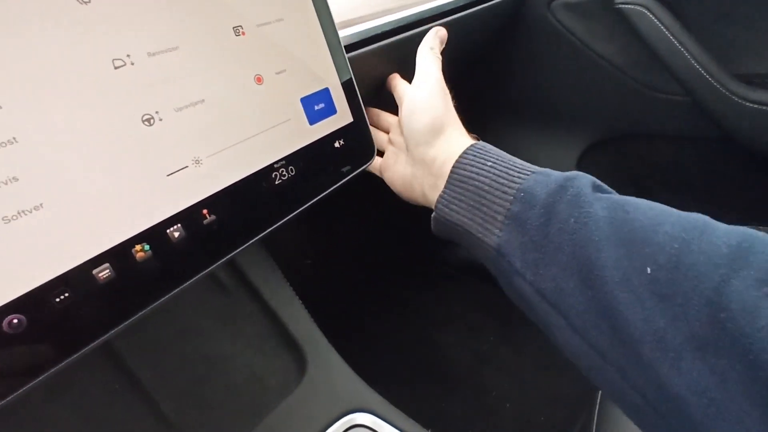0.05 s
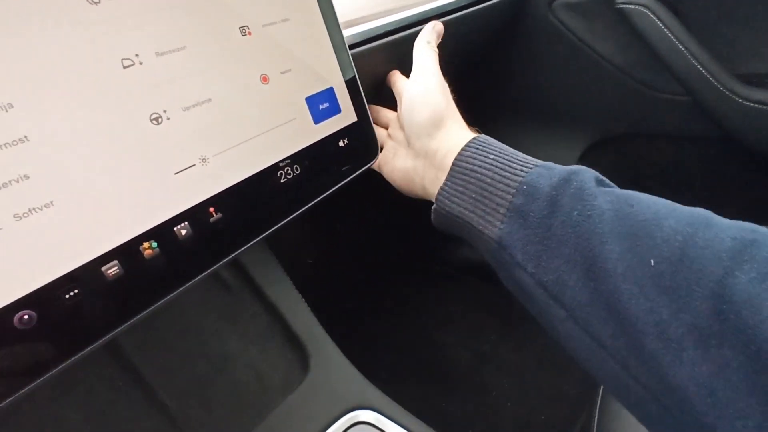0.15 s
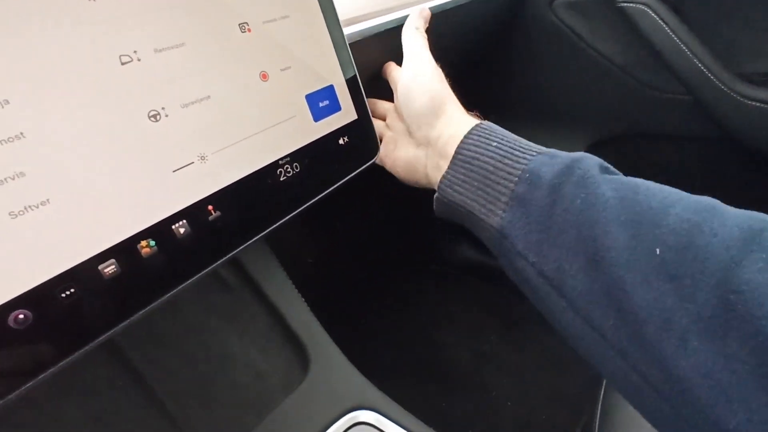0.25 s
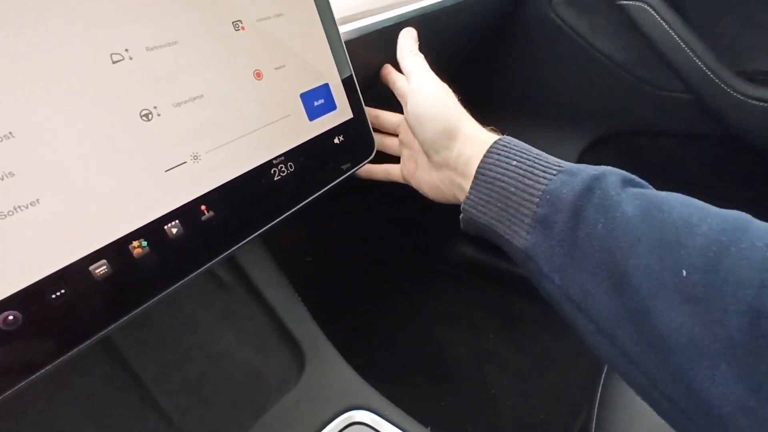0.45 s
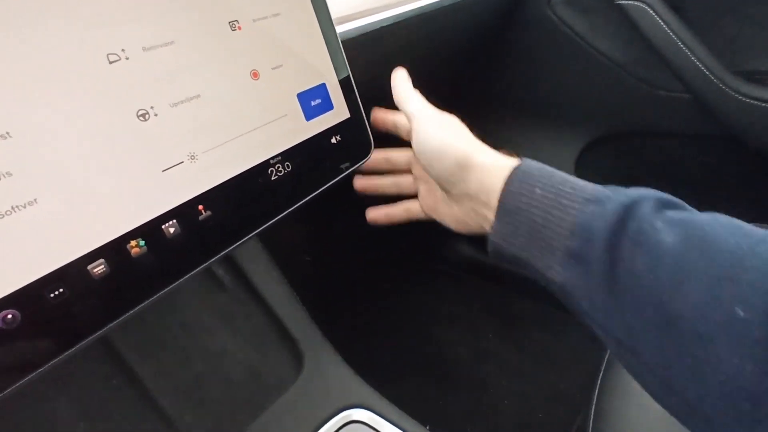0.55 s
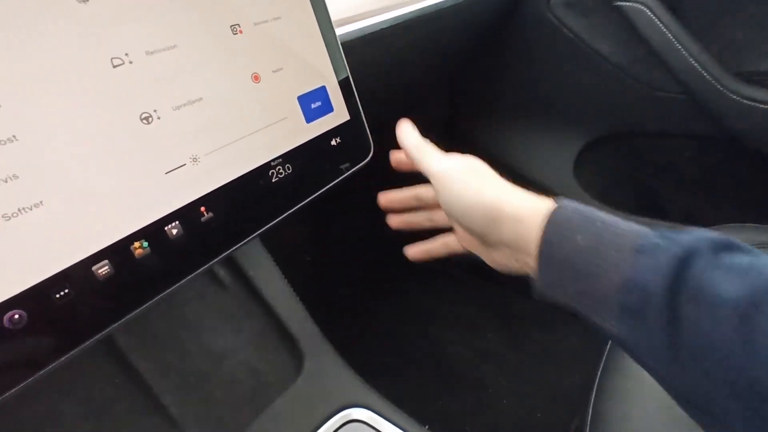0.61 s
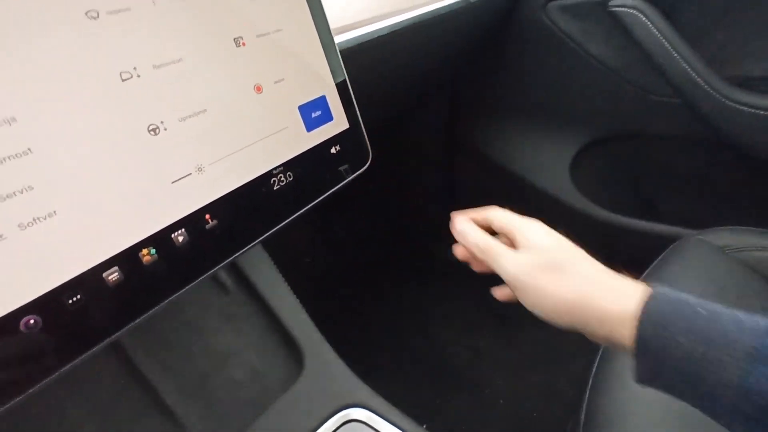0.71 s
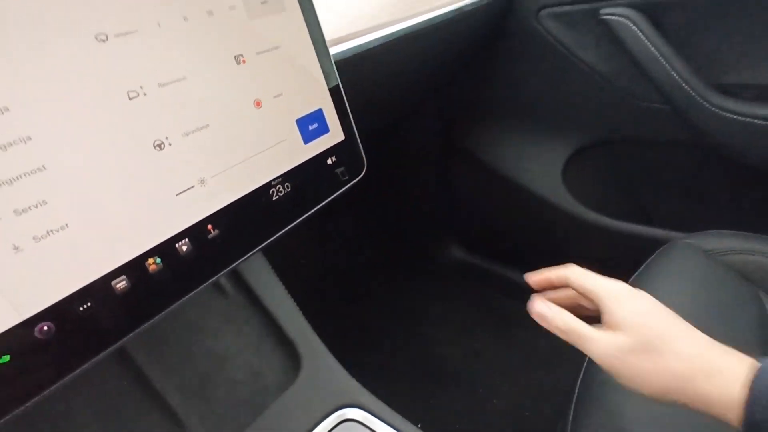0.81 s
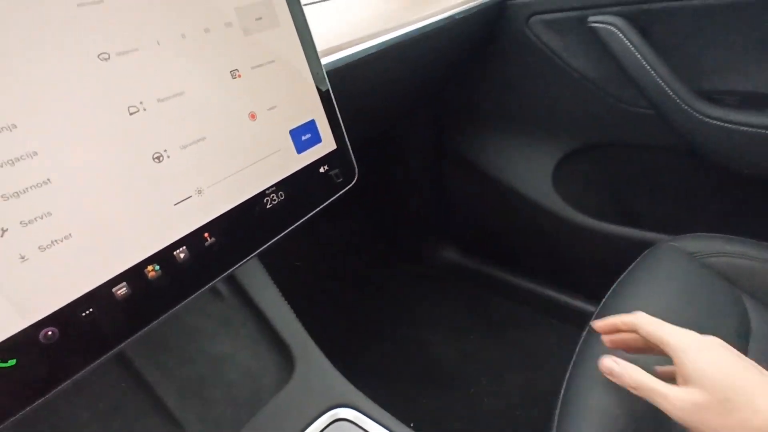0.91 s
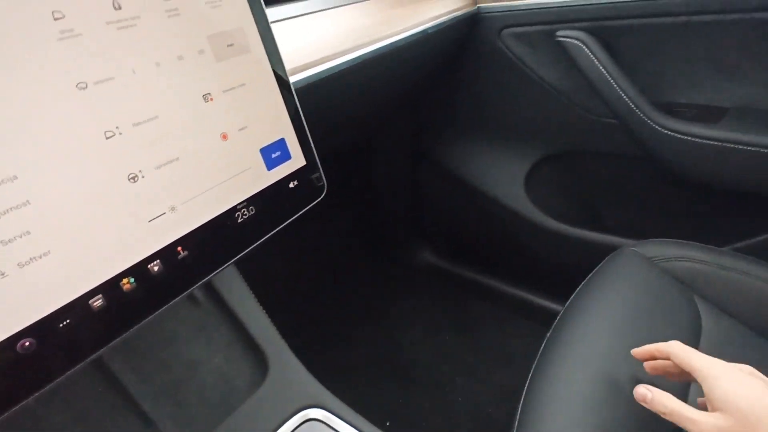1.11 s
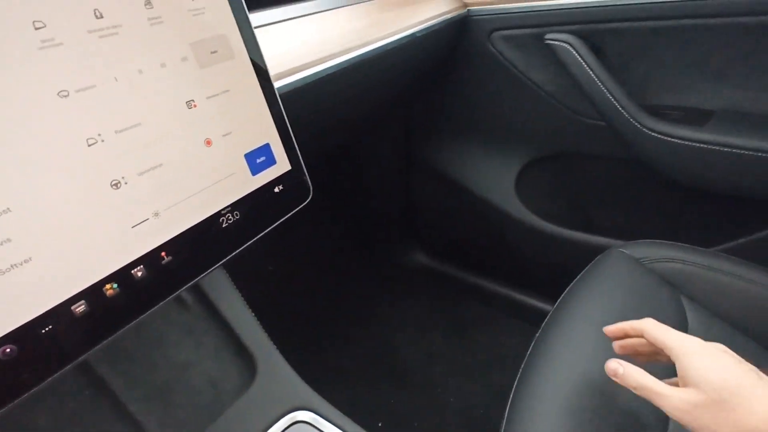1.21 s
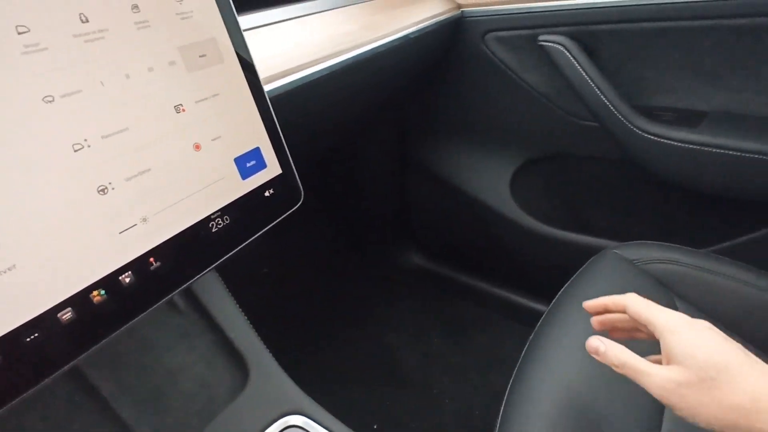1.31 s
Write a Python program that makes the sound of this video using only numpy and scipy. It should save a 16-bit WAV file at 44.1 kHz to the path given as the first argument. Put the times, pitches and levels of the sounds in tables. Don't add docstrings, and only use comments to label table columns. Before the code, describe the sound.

A plastic glovebox lid shuts in a parked car, heard close in a small, dry cabin. A faint knock tail fades at the start; around 0.2 s the lid rubs its frame and the latch snaps at 0.23 s in a bright, dense clack with a soft low thump. A tiny spring tone sags until about 0.75 s, with a faint finger slide; a quiet sleeve rustle follows from 0.75 s over low hum.

```python
import sys
import numpy as np
from scipy import signal
from scipy.fft import rfft, irfft, next_fast_len
from scipy.io import wavfile

SR = 44100
rng = np.random.default_rng(int(sys.argv[2]) if len(sys.argv) > 2 else 0)


def waveform_to_disk(signal):
    frames = np.transpose(np.atleast_2d(signal))
    scaled = np.clip(frames, -1, 1) * 32767
    samples = np.round(scaled).astype(np.int16)
    wavfile.write(sys.argv[1], SR, samples)


def attenuation_scalar(level_db):
    decades = np.asarray(level_db, float) / 20
    return 10 ** decades


N = 59535
LEAD = 2000

# (time [s], strength [dB], hardness of the bright crack [dB])
CONTACTS = [(-.004, -42, -12), (0.192, -45.5, -7.5), (0.2012, -42, -23.5), (0.2056, -43.5, -10.5),
            (0.2156, -37.5, -3), (.2200, -24.5, -13.5), (0.223, -34.5, 9), (.2270, -26.5, 8.5),
            (0.2294, -15, -3), (0.2323, -21, 4), (0.2369, -24, 6), (.2390, -26.5, 4), (0.2417, -26, -16.5),
            (0.2456, -30.5, -2), (0.2518, -30, -3.5), (0.2538, -37, -14), (0.265, -41.5, 9.5),
            (0.2768, -44.5, 5)]
# (frequency [Hz], level [dB], t60 [s])
LID_MODES = [(459, -10.5, 0.049), (531.8, -5.5, 0.057), (610, -17, 0.034), (778, -11.5, .03),
             (850, -5, 0.045), (980, -5, 0.015), (1123, -12, .03), (1231, -11.5, .03), (1487, -9.5, 0.062),
             (1715, -20, 0.029), (1940, -14.5, .04), (2377, -14.5, .03), (2590, -27.5, 0.011)]
# (frequency [Hz], level [dB], t60 [s])
LATCH_MODES = [(3120, -12.5, 0.017), (3258, -7.5, 0.033), (4000, 0.5, 0.013), (3970, -7.5, 0.012),
               (4600, -7, 0.041), (6250, -5, 0.03), (6720, -15, 0.011), (7300, -3.5, 0.024),
               (7850, -4, 0.005)]
LATCH_DB, STRIKE_SPREAD_DB = -9, 1
# (frequency [Hz], density [dB per Hz])
CRACK_COLOUR = [(500, -24.5), (1200, 4), (3000, -9.5), (7000, 2.5), (8600, -4), (9500, -16.5), (11400, -13),
                (12000, -10.5), (16000, -14.5)]
CRACK_DB, CRACK_T60_S = -6.5, 0.019
# (time [s], level [dB])
RATTLE = [
    (0, -54.5),
    (.03, -79),
    (.172, -75),
    (.19, -56.5),
    (.215, -44.5),
    (.2255, -33),
    (.2285, -26),
    (.245, -33.5),
    (.33, -67),
]
# (frequency [Hz], density [dB per Hz])
RATTLE_COLOUR = [(150, -24), (450, -3), (1000, -8.5), (1500, -6.5), (3000, -15), (8000, -20),
                 (10000, -36.5), (13000, -29)]
GRAINS_PER_S, GRAIN_SPREAD_DB = 12000, 2.0
# (time [s], then level into each of the three boom modes [dB])
PUSHES = [(-.0005, -68, -41, -46), (0.0114, -63, -41, -56), (0.2019, -55, -41, -42.5),
          (0.2127, -34, -30.5, -25.5), (0.2243, -48.5, -21.5, -27.5), (.2330, -40, -52.5, -18),
          (0.2369, -61, -54, -16.5), (0.2484, -46.5, -25, -45), (0.257, -56.5, -53, -25),
          (.273, -60, -48, -29), (0.2962, -35, -47, -55), (0.321, -50, -41, -63)]
# (frequency [Hz], t60 [s])
BOOM_MODES = [(83, 0.11), (127, 0.1), (280, 0.055)]
PUSH_CUT_HZ = 580
CABIN_T60_S, WET_DB, SEAT_CUT_HZ = 0.1, -14, 11000
# (time [s], level [dB])
SLEEVE = [(0, -63.5), (.06, -81.5), (.11, -71), (.17, -77), (.35, -85), (.6, -93.5), (.72, -74),
          (.79, -66.5), (.87, -64.5), (.95, -65.5), (1.02, -67.5), (1.18, -67.5), (1.21, -66.5),
          (1.25, -68.5), (1.32, -64.5), (1.35, -66)]
# (frequency [Hz], density [dB per Hz])
SLEEVE_COLOUR = [(300, -15), (800, 0.5), (1300, -3), (2500, -7), (4000, -5.5), (7000, -7), (12000, -17),
                 (16000, -11.5)]
# (frequency [Hz], density [dB per Hz])
RUMBLE_COLOUR = [(40, -21.5), (95, -2), (160, -10), (230, -4), (400, -11.5), (600, -20), (1000, -23.5),
                 (2000, -36)]
RUMBLE_DB = -54 - 3
# (frequency [Hz], width [Hz], level [dB])
HUM_TONES = [(100, 13, -64), (135, 10, -76.5), (224.5, 12, -64), (265, 8.8, -69.5), (378.5, 7.3, -73.5)]
# (frequency [Hz], density [dB per Hz])
HISS_COLOUR = [(1000, -15.5), (5000, -10), (12000, 2), (16000, -2.5)]
HISS_DB = -78.5
# (time [s], pitch [Hz], level [dB])
SPRING = [(.27, 1094, -80), (.298, 1089, -63), (.335, 1074, -69), (.4, 1068, -66), (.47, 1051, -64.5),
          (.505, 1045, -66), (.525, 1040, -74), (.62, 1020, -75), (.77, 996, -78)]
# (multiple of pitch [ratio], level [dB], fade [dB per s])
SPRING_PARTS = [(1.0, 0.0, 0.0), (2.0, -9, 110), (1.415, -7, 50)]
# (time [s], level [dB])
FINGER = [(.33, -89.5), (.365, -74), (.41, -70), (.45, -77), (.5, -71.5), (.53, -93), (1.18, -89),
          (1.21, -74), (1.24, -98)]
# (frequency [Hz], density [dB per Hz])
FINGER_COLOUR = [(2000, -18), (6000, -15), (8000, -7.5), (13000, -6), (16000, -4.5)]
# (frequency [Hz], gain [dB])
MICROPHONE = [(4600, -2), (5000, -10), (5950, -7.5), (6250, -2.5), (7700, -0.5), (8750, -14),
              (11400, -20.5), (11650, -5.5)]
# (frequency [Hz], gain [dB])
BAND_EDGES = [(8350, 0.0), (8600, -6), (15620, -6), (15760, -80)]
BASS_CUT_HZ = 56
OVERLOAD = 0.81


def rms_one(x):
    return x / np.sqrt(np.mean(x ** 2) + 1e-20)


def in_time(rows):
    s, *columns = np.transpose(rows)
    return [np.interp(np.arange(N) / SR, s, column) for column in columns]


def colour(x, points):
    size = next_fast_len(len(x) + 4096)
    hz = np.maximum(np.arange(size // 2 + 1) * SR / size, 1)
    points_hz, points_db = np.array(points)[:, 0], np.array(points)[:, 1]
    gain = attenuation_scalar(np.interp(np.log(hz), np.log(points_hz), points_db))
    return irfft(rfft(x, size) * gain, size)[:len(x)]


def drift(rate_hz):
    r = np.exp(-80 * np.pi * rate_hz / SR)
    noise = rng.standard_normal(N // 40 + 2002)
    slow = signal.lfilter([1], [1, -2 * r, r * r], noise)[2000:]
    return np.interp(np.arange(N) / 40, np.arange(len(slow)), rms_one(slow))


def patchy(spectrum, patchy_db):
    white = rng.standard_normal((2, N))
    edges = 20 * 2 ** np.arange(0, 10.1, .5)
    out = 0
    for k, (low, high) in enumerate(zip(edges, edges[1:])):
        sos = signal.butter(2, [low, high], "band", fs=SR, output="sos")
        band = signal.sosfilt(sos, white[k % 2])
        out = out + band * attenuation_scalar(patchy_db * drift(8.1))
    return rms_one(colour(out, spectrum))


def ring(x, hz, t60):
    r, w = attenuation_scalar(-60 / (t60 * SR)), 2 * np.pi * hz / SR
    return signal.lfilter([0, np.sin(w)], [1, -2 * r * np.cos(w), r * r], x + 1e-18)


def clicks_at(times_s, heights):
    clicks = np.zeros(N + LEAD)
    clicks[(np.array(times_s) * SR).astype(int) + LEAD] = heights
    return clicks


def rattle():
    present = rng.random(N) < GRAINS_PER_S / SR
    sign = rng.choice([-1, 1], N)
    strength = attenuation_scalar(GRAIN_SPREAD_DB * np.minimum(rng.exponential(1, N), 3))
    grains = rms_one(colour(present * sign * strength, RATTLE_COLOUR))
    moving = np.arange(N) < RATTLE[-1][0] * SR
    return grains * attenuation_scalar(in_time(RATTLE)[0]) * moving


def strikes(modes, strength_db):
    times_s = np.array(CONTACTS)[:, 0]
    shape = (len(times_s), 14)
    spread, sign = rng.standard_normal(shape), rng.choice([-1, 1], shape)
    out = np.zeros(N + LEAD)
    for k, (hz, db, t60) in enumerate(modes):
        heights = sign[:, k] * attenuation_scalar(strength_db + db + STRIKE_SPREAD_DB * spread[:, k])
        out += ring(clicks_at(times_s, heights), hz, t60)
    return out[LEAD:]


def cracks(strength_db):
    clicks = clicks_at(np.array(CONTACTS)[:, 0], attenuation_scalar(strength_db + CRACK_DB))
    decay = attenuation_scalar(-60 / (CRACK_T60_S * SR))
    envelope = signal.lfilter([1], [1, -decay], clicks + 1e-18)[LEAD:]
    return envelope * rms_one(colour(rng.standard_normal(N), CRACK_COLOUR))


def lid():
    _, strength_db, hardness_db = np.transpose(CONTACTS)
    bright_db = strength_db + hardness_db
    rubbing = rattle()
    body = strikes(LID_MODES, strength_db)
    latch = strikes(LATCH_MODES, bright_db + LATCH_DB)
    return body + latch + cracks(bright_db) + rubbing


def boom():
    rows, out = np.array(PUSHES), np.zeros(N + LEAD)
    for k, (hz, t60) in enumerate(BOOM_MODES):
        out += ring(clicks_at(rows[:, 0], attenuation_scalar(rows[:, k + 1])), hz, t60)
    return signal.sosfilt(signal.butter(2, PUSH_CUT_HZ, fs=SR, output="sos"), out)[LEAD:]


def cabin(x):
    size = next_fast_len(N + SR)
    hz = np.arange(size // 2 + 1) * SR / size
    response = 0
    for k, lag_s in enumerate(rng.uniform(.004, .022, 24)):
        loss = attenuation_scalar(-60 * lag_s / CABIN_T60_S)
        dulling = (1 + 1j * hz / SEAT_CUT_HZ) ** (lag_s * 30)
        loop = loss / dulling * np.exp(-2j * np.pi * hz * lag_s)
        response = response + (-1) ** k * loop / (1 - loop)
    return irfft(rfft(x, size) * response, size)[:N] / 2


def sleeve():
    return attenuation_scalar(in_time(SLEEVE)[0] + 4) * patchy(SLEEVE_COLOUR, patchy_db=1.5)


def cabin_hum():
    tones = 0
    for hz, width_hz, db in HUM_TONES:
        t60 = np.log(1000) / np.pi / width_hz
        tone = ring(rng.standard_normal(N + SR), hz, t60)[SR:]
        tones = tones + attenuation_scalar(db) * rms_one(tone)
    return attenuation_scalar(RUMBLE_DB) * patchy(RUMBLE_COLOUR, patchy_db=2.0) + tones


def hiss():
    return attenuation_scalar(HISS_DB) * rms_one(colour(rng.standard_normal(N), HISS_COLOUR))


def spring():
    hz, db = in_time(SPRING)
    s = np.arange(N) / SR
    phase = 2 * np.pi * np.cumsum(hz) / SR
    age = np.maximum(s - SPRING[1][0], 0)
    tone = 0
    for multiple, part_db, fade in SPRING_PARTS:
        tone = tone + attenuation_scalar(db + part_db - fade * age) * np.sin(multiple * phase)
    return np.sqrt(2) * tone * (s > SPRING[0][0]) * (s < SPRING[-1][0])


def finger():
    return attenuation_scalar(in_time(FINGER)[0] + 10.0) * patchy(FINGER_COLOUR, patchy_db=1.4)


def scene():
    box = lid()
    touches = sleeve() + hiss() + finger()
    shutting = box + boom() + attenuation_scalar(WET_DB) * cabin(box)
    return (shutting + touches + spring() + cabin_hum())[None]


def roll_off(x):
    return signal.sosfilt(signal.butter(12, 15750, fs=SR, output="sos"), x)


def record(dry):
    bass_cut = signal.butter(3, BASS_CUT_HZ, "high", fs=SR, output="sos")
    x = signal.sosfilt(bass_cut, colour(dry[0], MICROPHONE))
    rounded = OVERLOAD * np.tanh(x / OVERLOAD)
    return roll_off(colour(rounded, BAND_EDGES)[None])


dry = scene()
out = record(dry)
waveform_to_disk(out)
```